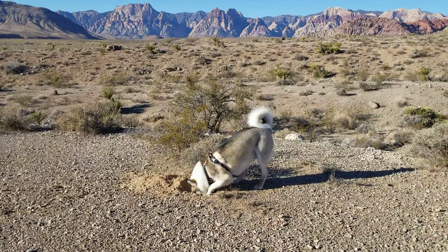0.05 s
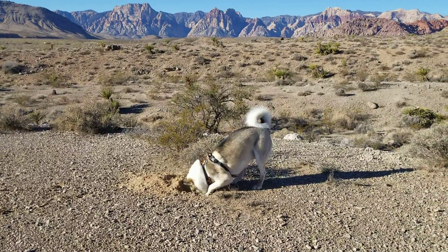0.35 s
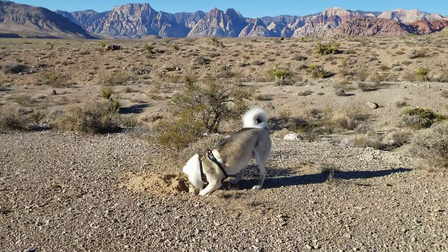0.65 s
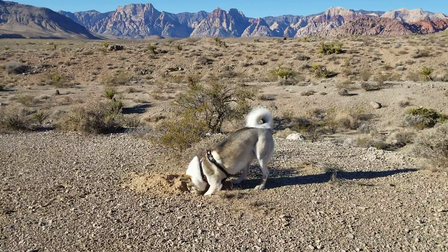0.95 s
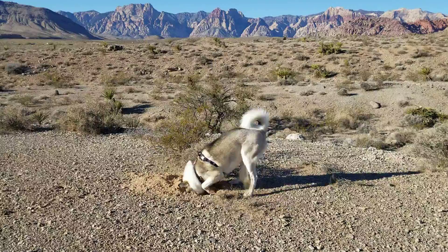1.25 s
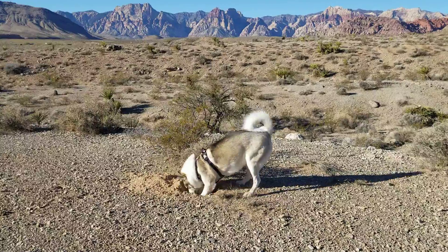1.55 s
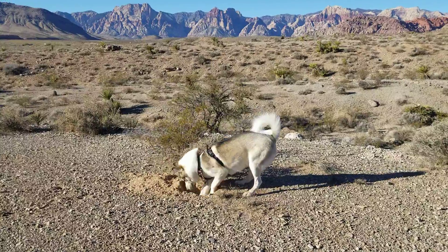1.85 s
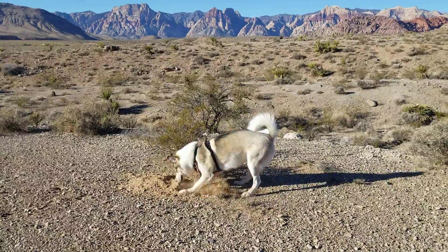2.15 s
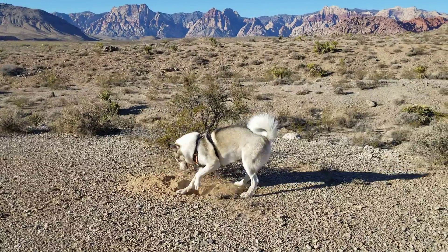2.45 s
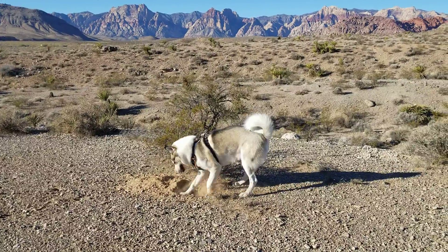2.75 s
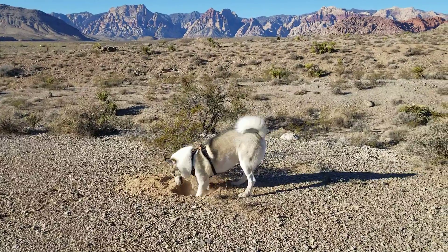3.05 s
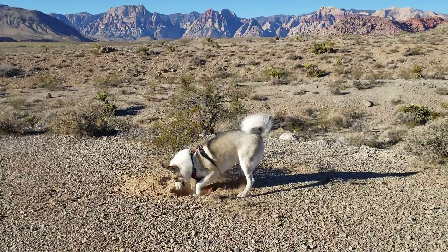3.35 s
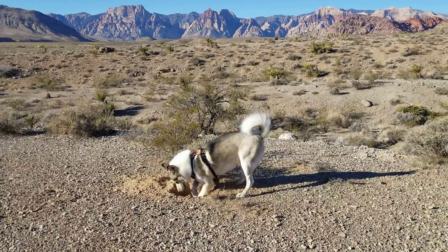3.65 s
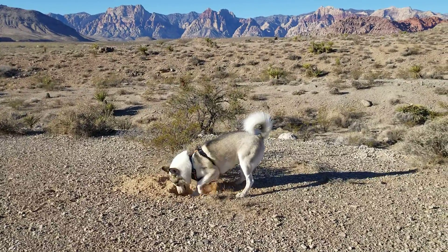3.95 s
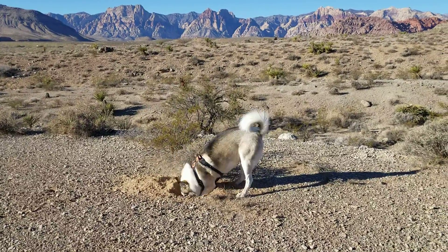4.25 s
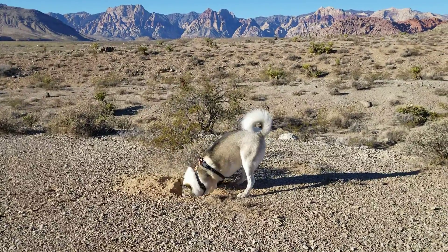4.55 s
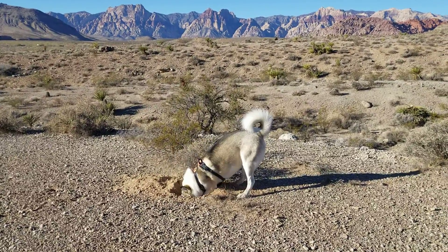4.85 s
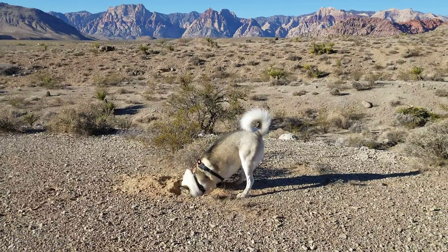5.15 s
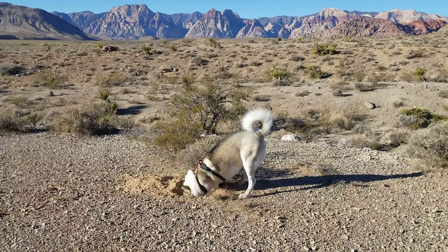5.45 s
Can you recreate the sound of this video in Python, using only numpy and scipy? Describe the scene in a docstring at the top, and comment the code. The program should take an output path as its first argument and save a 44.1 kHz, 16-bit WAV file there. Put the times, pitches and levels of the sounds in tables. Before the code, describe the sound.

Light wind rumbles outdoors as a dog's paws scrape and thud in gritty dirt and its metal tags clink.

```python
"""Open desert, no walls: light wind rumbles on the microphone over a faint far drone and steady hiss.
After a soft swish, a dog a few metres away starts digging at 0.5 s: claws rake dry, gravelly soil,
paws thud on it, thrown grit scatters. From 1.1 s the metal tags on its harness knock, tick and ring.
The digging peaks near 2.6 s and stops by 4.3 s; wind, drone and hiss remain."""
import sys
import numpy as np
from scipy import signal
from scipy.fft import rfft, irfft
from scipy.io import wavfile
from scipy.ndimage import uniform_filter1d

SR = 44100
rng = np.random.default_rng(int(sys.argv[2]) if len(sys.argv) > 2 else 0)


def wav_out(sig):
    """Save sig, one row per channel (or a flat mono array), as 16-bit PCM at SR to the path in sys.argv[1]."""
    wavfile.write(sys.argv[1], SR, np.round(np.clip(np.atleast_2d(sig).T, -1, 1) * 32767).astype(np.int16))


N = 242991
TIME_S = np.arange(N) / SR
FREQ_HZ = np.maximum(np.arange(N // 2 + 1) * SR / N, 1)

# wind strength: t/s, level/dB
WIND_LEVEL = [(0, -43.5), (.6, -46), (1.8, -43), (2.15, -47), (3.05, -44.5), (3.5, -48.5), (5.5, -48.5)]
# microphone hiss: f/Hz, left density/dB, right density/dB
HISS_SPECTRA = [(600, -110, -112), (1320, -109, -113), (1686, -88.5, -114), (2397, -113, -116),
                (3010, -107, -118), (3517, -96, -120), (4720, -93, -121), (5560, -107, -120),
                (6400, -105, -119), (7020, -127, -128), (9200, -127, -130), (10200, -112, -118),
                (14470, -110, -110)]
# soft swishes: t/s, half-width/s, level/dB
SWISHES = [(0.109, 0.07, -49.5), (.3, 0.11, -58), (.82, 0.2, -60.5)]
# stereo image of the digging spot: f/Hz, left re right/dB, coherence
DIG_STEREO = [(300, 1.5, 1), (702, -0.5, 0.59), (1400, 3, 0.35), (2392, -0.5, .45), (4050, 4.5, 0.12),
              (8000, -27, .3), (15180, -10.5, .05)]
# claw strokes: t/s, length/s, level/dB, rasp centre f/Hz (lower when deeper)
STROKES = [(0.484, 0.18, -58, 1140), (0.929, 0.18, -68.5, 520), (1.645, 0.14, -56, 704),
           (1.771, 0.13, -65.5, 550), (1.856, 0.28, -63.5, 710), (2.044, 0.19, -57.5, 958),
           (2.25, 0.058, -47, 1400), (2.29, 0.13, -47.5, 1210), (2.515, 0.076, -45, 1170),
           (2.6, 0.14, -59.5, 1243), (2.71, .12, -49, 1024), (2.876, 0.099, -49.5, 1050),
           (2.958, .19, -58.5, 910), (3.199, 0.19, -62, 840), (3.287, 0.22, -58.5, 1060),
           (3.435, 0.21, -59, 865), (3.615, 0.13, -57.5, 1010), (3.715, 0.21, -63, 810),
           (3.935, 0.25, -61, 800)]
# rasp of one stroke: f/centre, level/dB
RASP_SHAPE = [(.4, -6.5), (.7, 4.5), (1.25, 4.5), (1.8, -0.5), (3.0, -3.5)]
# paw strikes: t/s, level/dB, f/Hz, relative crunch/dB
PAW_STRIKES = [(0.529, -42.5, 270, -22), (1.029, -49, 282, -29), (1.662, -42.5, 297, -13.5),
               (1.696, -45, 610, -5), (1.709, -41, 607, -11), (1.732, -36, 244, -19),
               (2.336, -35.5, 252, -13), (2.552, -34, 254, -11), (2.582, -18.5, 233, -15),
               (2.758, -33.5, 304, -17), (2.892, -48, 433, -5), (2.926, -32.5, 272, -10),
               (3.053, -39.5, 298, -23), (3.343, -40.5, 264, -7), (3.375, -48, 399, 4.5),
               (3.592, -40.5, 273, -15.5), (3.658, -43, 256, -5.5), (4.025, -42.5, 207, -27),
               (4.103, -45, 236, -25)]
# packed-soil modes: f/strike pitch, level/dB, t60/s
SOIL_MODES = [(.65, -10.5, 0.033), (1.04, 7, 0.034), (1.9, -7.5, 0.0092)]
# digging effort, keeps loose grit running: t/s, level/dB
EFFORT = [(0, -11), (1.3, -5), (1.55, -11), (1.9, -1.5), (2.7, 6.5), (3.1, -4), (3.35, -0.5), (4.15, -7.5),
          (4.55, -23)]
# tag knocks: t/s, level/dB, base t60/s, strike point (0 rim, 1 centre)
KNOCKS = [(1.165, -40, 0.036, 0.33), (1.178, -30.5, 0.033, 0.2), (1.318, -38.5, 0.055, .2),
          (1.363, -28, 0.054, 0.58), (1.495, -40, 0.065, 0.53), (1.556, -33.5, 0.022, 0.45),
          (1.701, -36, 0.072, .7), (1.756, -31, 0.056, 0.053), (1.871, -34, 0.054, .75),
          (1.887, -37, 0.088, 0.72), (1.913, -36, 0.03, 0.72), (1.948, -34.5, 0.052, 0.51),
          (1.9953, -24, 0.01, 0.84), (2.0045, -40, 0.03, .74), (2.17, -37, 0.026, 0.75),
          (2.2344, -43, 0.037, .2), (2.381, -21, 0.019, 0.35), (2.424, -19, .035, 0.065),
          (2.494, -22, 0.036, 0.99), (2.5346, -31.5, 0.037, 0.52), (2.5832, -9.5, 0.039, 0.47),
          (2.621, -21, 0.085, 0.42), (2.721, -11.5, 0.032, 0.28), (2.744, -31, 0.064, 0.49),
          (2.8237, -32.5, 0.11, 0.39), (2.9418, -36.5, 0.071, 0.33), (2.979, -41.5, 0.13, .85),
          (3.061, -31.5, 0.076, 0.47), (3.1674, -28.5, 0.11, 0.37), (3.2259, -23, 0.034, .45),
          (3.2405, -22, 0.12, 0.89), (3.2484, -16.5, 0.079, 0.46), (3.3288, -24.5, 0.046, 0.53),
          (3.374, -20, 0.011, .22), (3.388, -28, 0.095, 0.45), (3.4475, -31.5, 0.11, 0.57),
          (3.4972, -35.5, 0.074, 0.52), (3.5537, -34.5, 0.085, 0.47), (3.588, -41.5, 0.043, 0.67),
          (3.6315, -26.5, 0.058, 0.33), (3.6775, -26.5, .014, 0.35), (3.7458, -9, 0.012, 0),
          (3.757, -30, 0.054, .45), (3.789, -39.5, 0.057, .72), (3.88, -36, 0.035, 0.43),
          (3.9157, -33, 0.015, 0.35), (4.0089, -30.5, .05, .75), (4.029, -30, 0.064, .7),
          (4.079, -28, 0.0088, 0.37), (4.136, -28.5, 0.042, 0.42), (4.146, -27, 0.058, 0.61),
          (4.2374, -31, 0.064, 0.47)]
# tag modes: f/Hz
TAG_HZ = [3822, 5397, 5407, 5802, 9060, 12130, 12375, 12460, 12760, 13136, 13571, 15588]
# per tag mode: level in group/dB, t60/base t60, extra t60/s, left re right/dB
TAG_MODES = [(-28.5, 1.5, 0.034, -7.5), (-6.5, 1.5, 0.044, -10), (-2.5, 2.0, 0.082, -10),
             (-19, 1.0, 0, -13), (-3, 1.0, 0.017, -15), (-17, .6, 0.02, -22.5), (-7.5, 1.2, 0.00016, -31),
             (-6.5, 1.0, 0, -11.5), (-1, 1.05, 0.0089, -32.5), (-20.5, 1.2, 0.06, -16.5),
             (-27, 1.0, 0.02, -26), (-3.5, 1.0, 0.032, -5.5)]
# per tag mode: group (0 low, 1 middle, 2 main, 3 top)
TAG_GROUP = [0, 0, 0, 0, 1, 2, 2, 2, 2, 2, 2, 3]
# tag excitation re main modes: strike point, low/dB, middle/dB, top/dB, tick/dB
STRIKE_RESPONSE = [(0, -59, -45.5, -25, -39), (.25, -28.5, -26.5, -13.5, -19.5), (.5, -11, -21, -21, -18.5),
                   (.75, 0.5, -11, -8.5, -5.5), (1, -22, 4.5, -18, -19)]
# source spectra: f/Hz, relative density/dB
WIND_SPECTRUM = [(20, -18), (35, -13), (55, 2), (90, 0.5), (130, -7.5), (200, -15), (300, -18),
                 (450, -29.5), (650, -36.5), (1000, -55), (2000, -83.5)]
SWISH_SPECTRUM = [(1300, -8), (2000, 5), (2600, 1.5), (3300, -9), (4600, 0.5), (6000, 4), (8300, -13),
                  (10500, -7.5), (13500, 1.5), (15800, -7)]
CLOD_SPECTRUM = [(110, -13.5), (200, 0), (330, -3.5), (450, -9.5), (700, -10.5), (1100, -62)]
CRUNCH_SPECTRUM = [(400, -6.5), (700, -4), (1300, 6), (1800, -1), (2600, -18.5), (4000, -9)]
GRIT_SPECTRUM = [(1100, -3), (2200, -0.5), (3200, -2.5), (4400, 2), (5800, 10.5), (7200, -1.5), (8400, -8),
                 (10500, 0.5), (13500, 12.5), (16000, -15)]
TICK_SPECTRUM = [(2500, -15), (4000, -9), (5500, 22.5), (7000, 4.5), (8300, 2.5), (10500, 10.5),
                 (12500, 18), (16000, -20.5)]

TYPICAL_RASP_HZ = 1006


def from_db(db):
    return 10 ** (np.asarray(db) / 20)


def unit_rms(x):
    return x / np.sqrt(np.mean(x ** 2) + 1e-20)


def over_time(rows):
    return np.interp(TIME_S, *np.transpose(rows))


def over_freq(rows):
    hz, *columns = np.transpose(rows)
    return [np.interp(np.log(FREQ_HZ), np.log(hz), column) for column in columns]


def band_gains(spectrum):
    """Unit-power filter, steep beyond the table's ends."""
    octaves_below = np.maximum(np.log2(spectrum[0][0] / FREQ_HZ), 0)
    octaves_above = np.maximum(np.log2(FREQ_HZ / spectrum[-1][0]), 0)
    return unit_rms(from_db(over_freq(spectrum)[0] - 31.6 * (octaves_below + octaves_above)))


def drift(rate_hz):
    """Smooth random curve, rms 1."""
    knots = signal.resample_poly(rng.standard_normal(int(N / SR * rate_hz) + 4), 4, 1)
    return unit_rms(np.interp(TIME_S * rate_hz * 4, np.arange(len(knots)), knots))


def grains(per_s, spread_db):
    """Two independent trains of tiny collisions, mostly weak; rms 1."""
    trains = np.zeros(2 * N)
    place, size, sign = rng.random((int(2 * per_s * N / SR), 3)).T
    size_db = spread_db * np.minimum(-np.log(1 - size), 4)
    trains[(place * 2 * N).astype(int)] = from_db(size_db) * np.sign(sign - .5)
    return unit_rms(trains.reshape(2, N))


def bursts(times_s, levels_db, t60_s, weights=1):
    """Envelope that jumps at each time, then decays."""
    kicks = np.zeros(N)
    kicks[(times_s * SR).astype(int)] = from_db(levels_db) * weights
    return signal.lfilter([1], [1, -from_db(-60 / (t60_s * SR))], kicks + 1e-18)


def at_dig(pair, spectrum=None):
    """Two independent signals to stereo, optionally filtered: bass centred, treble right."""
    spectra = rfft(pair) * (1 if spectrum is None else band_gains(spectrum))
    left_db, coherence = over_freq(DIG_STEREO)
    mid, side = spectra * np.sqrt([(1 + coherence) / 2, (1 - coherence) / 2])
    return irfft(np.array([(mid + side) * from_db(left_db), mid - side]), N)


def wind(gain_db, lumps_db, side_db, eddy_hz):
    """Lumpy rumble on the microphone; only the slowest eddies differ much between sides."""
    width = from_db(side_db) + (eddy_hz / (FREQ_HZ + eddy_hz)) ** 2
    spectra = rfft(rng.standard_normal((2, N))) * band_gains(WIND_SPECTRUM)
    mid, side = irfft(spectra * [np.ones_like(width), width], N)
    level_db = over_time(WIND_LEVEL) + gain_db + lumps_db * drift(14)
    return np.array([mid + side, mid - side]) * from_db(level_db)


def drone(hz, level_db, waver_hz, waver_db, octave_db):
    """Far wavering hum, like an engine heard through moving air."""
    phase = 2 * np.pi * np.cumsum(hz + waver_hz * drift(9)) / SR
    tone = np.sin(phase) + from_db(octave_db) * np.sin(2 * phase)
    return from_db(level_db + waver_db * drift(6)) * tone


def hiss(gain_db):
    """Each microphone's own noise, stronger on the left."""
    density = from_db(np.array(over_freq(HISS_SPECTRA)) + gain_db)
    return irfft(rfft(rng.standard_normal((2, N))) * density, N) * np.sqrt(SR / 2)


def swishes(left_db):
    """Short airy swells, off to the right."""
    swell = sum(from_db(db) * np.exp(-((TIME_S - at_s) / half_s) ** 2) for at_s, half_s, db in SWISHES)
    return at_dig(rng.standard_normal((2, N)) * swell, SWISH_SPECTRUM) * from_db([[left_db], [0]])


def strokes():
    """Per claw stroke: sample span, half-sine swell, rasp centre."""
    for start_s, length_s, db, hz in STROKES:
        first, size = int(start_s * SR), int(length_s * SR)
        yield slice(first, first + size), from_db(db) * np.sin(np.pi * np.arange(size) / size), hz


def raking(rasp_db, catch_db, clod_db_per_octave):
    """Claws catch and slip: dry rasp over dull clods; deeper strokes break more clods."""
    catch = from_db(catch_db * drift(80))
    crumbs = grains(per_s=2400, spread_db=3.6) * catch
    clod_level, rasp = np.zeros(N), np.zeros((2, N))
    ratios, shape_db = np.transpose(RASP_SHAPE)
    for span, swell, hz in strokes():
        clod_level[span] += from_db(-clod_db_per_octave * np.log2(hz / TYPICAL_RASP_HZ)) * swell
        bins_hz = np.maximum(np.fft.rfftfreq(len(swell), 1 / SR), 1)
        band_db = np.interp(np.log(bins_hz / hz), np.log(ratios), shape_db, left=-30, right=-60)
        scrape = irfft(rfft(crumbs[:, span]) * unit_rms(from_db(band_db)), len(swell))
        rasp[:, span] += from_db(rasp_db) * swell * scrape
    clods = grains(per_s=1500, spread_db=3.1) * clod_level * catch
    return at_dig(clods, CLOD_SPECTRUM) + at_dig(rasp)


def paws(thud_db, crunch_db, crunch_t60_s):
    """Paws thump packed soil and crush its crust."""
    times_s, levels_db, pitches_hz, crust_db = np.transpose(PAW_STRIKES)
    thuds, t = np.zeros(N), TIME_S[:SR // 8]
    attack = 1 - np.exp(-t / 0.0015)
    for at_s, db, hz in zip(times_s, levels_db, pitches_hz):
        thud = sum(from_db(mode_db - 60 * t / t60_s) * np.sin(2 * np.pi * hz * ratio * t)
                   for ratio, mode_db, t60_s in SOIL_MODES)
        first = int(at_s * SR)
        thuds[first:first + len(t)] += from_db(db + thud_db) * thud * attack
    crush = bursts(times_s, levels_db + crust_db + crunch_db, crunch_t60_s)
    return thuds + at_dig(grains(per_s=3294, spread_db=2.9) * crush, CRUNCH_SPECTRUM)


def grit(throw_db, throw_db_per_octave, settle_t60_s, trickle_db, clump_db):
    """Sand and small stones fall in clumps over a trickle; deeper strokes throw less."""
    thrown = np.zeros(N)
    for span, swell, hz in strokes():
        thrown[span] += from_db(throw_db + throw_db_per_octave * np.log2(hz / TYPICAL_RASP_HZ)) * swell
    pole = from_db(-60 / (settle_t60_s * SR))
    falling = signal.lfilter([1 - pole], [1, -pole], thrown + 1e-18)
    flow = np.hypot(falling, from_db(trickle_db + over_time(EFFORT)))
    stones = grains(per_s=150, spread_db=3.6)
    sand = grains(per_s=12000, spread_db=1.7)
    return at_dig((sand + stones) * flow * from_db(clump_db * drift(40)), GRIT_SPECTRUM)


def strike_db(point):
    """Low, middle, main, top and tick levels for a strike point on a tag."""
    points, *columns = np.transpose(STRIKE_RESPONSE)
    low, middle, top, tick = (np.interp(point, points, column) for column in columns)
    return np.array([low, middle, np.zeros_like(low), top, tick])


def tag_ring(t60_s, group_db, free_s, vary_db=4, bend_cycles=1.5, buzz_cycles=0.68):
    """One ring: holds, sinks faster as the tags settle together, is choked after free_s."""
    mode_db, t60_ratio, extra_s, left_db = np.transpose(TAG_MODES)
    t = TIME_S[:int(min(free_s + .012, .3) * SR)]
    emphasis, bend = rng.standard_normal((2, len(TAG_HZ), 1))
    upper = (np.array(TAG_GROUP) >= 2)[:, None]   # main and top modes vary per knock
    start_db = (group_db[TAG_GROUP] + mode_db)[:, None] + vary_db * emphasis * upper
    life_s = (t60_s * t60_ratio + extra_s)[:, None]
    fade = from_db(start_db - 60 * (t / life_s) ** 1.4)
    # tags pressed harder ring shorter, bend and buzz more
    walks = np.cumsum(rng.standard_normal((len(TAG_HZ), 320)), axis=1)   # 1 ms steps
    wander = np.array([np.interp(t, np.arange(320) / 1000, walk) for walk in walks])
    offset_cycles = bend_cycles * bend * t / life_s + buzz_cycles * wander / np.sqrt(1000 * life_s)
    cycles = np.array(TAG_HZ)[:, None] * (t + rng.uniform(0, 0.0088)) + upper * offset_cycles
    modes = fade * np.sin(2 * np.pi * cycles)
    attack = 1 - np.exp(-t / 0.00042)
    choke = np.exp(-np.maximum(t - free_s, 0) / 0.0026)
    return np.array([from_db(left_db) @ modes, modes.sum(axis=0)]) * attack * choke


def tag_jingle(gain_db, faint_db, faint_t60_s, faint_count, faint_span_s):
    """Tags knock together, each knock choking the last; faint random touches fall between."""
    gaps_s = np.diff([row[0] for row in KNOCKS] + [N / SR])
    touches = [(*row, gap_s) for row, gap_s in zip(KNOCKS, gaps_s)]
    start_s, end_s = faint_span_s
    slot_s = (end_s - start_s) / faint_count
    for slot, (jitter, point) in enumerate(rng.random((faint_count, 2))):
        touches.append((start_s + (slot + jitter) * slot_s, faint_db, faint_t60_s, point / 2, .04))
    jingle = np.zeros((2, N))
    for at_s, db, t60_s, point, free_s in touches:
        ring = tag_ring(t60_s, db + strike_db(point)[:-1], free_s)
        first = int(at_s * SR)
        jingle[:, first:first + ring.shape[1]] += ring
    return from_db(gain_db) * jingle


def tag_ticks(graze_db, graze_lead_s, edge_db, rattle_db):
    """Tags graze, meet with a hard edge, then rattle in small rebounds."""
    times_s, db, ring_s, point = np.transpose(KNOCKS)
    clack_db = -1.5 * np.log2(ring_s / 0.0488)   # pressed tags ring less, clack more
    tick_db = db + strike_db(point)[-1] + clack_db
    lead_s = graze_lead_s * rng.uniform(0.404, 1, len(times_s))
    graze = bursts(times_s - lead_s, db + graze_db, t60_s=0.06)
    edge = bursts(times_s, tick_db + edge_db, t60_s=0.016)
    contact = grains(per_s=12000, spread_db=2.2) * uniform_filter1d(graze + edge, size=24)
    rattle = grains(per_s=460, spread_db=2.81) * bursts(times_s, tick_db + rattle_db, t60_s=0.1)
    return at_dig(contact + rattle, TICK_SPECTRUM)


def tag_afterring(gain_db, t60_s, swell_s, waver_hz, flutter_db, left_db):
    """A free-swinging tag picks up each knock and sings on in its lowest strong mode."""
    times_s, db, ring_s, point = np.transpose(KNOCKS)
    drive = bursts(times_s, db + strike_db(point)[0] + gain_db, t60_s, ring_s / ring_s.mean())
    pole = np.exp(-1 / (swell_s * SR))
    swell = signal.lfilter([1 - pole], [1, -pole], drive)
    phase = 2 * np.pi * np.cumsum(np.mean(TAG_HZ[1:3]) + waver_hz * drift(20)) / SR
    return swell * np.sin(phase) * from_db(flutter_db * drift(14) + [[left_db], [0]])


def delay_right(pair, lag_s):
    """Travel time between the microphones."""
    return np.array([pair[0], np.interp(TIME_S - lag_s, TIME_S, pair[1])])


def scene():
    """Harness and dirt over the open-air background."""
    tags = tag_jingle(gain_db=0.5, faint_db=-41.5, faint_t60_s=0.041, faint_count=26,
                      faint_span_s=(1.1, 4.25))
    tags += tag_ticks(graze_db=-29.5, graze_lead_s=0.017, edge_db=8, rattle_db=-5)
    tags += tag_afterring(gain_db=-11.5, t60_s=0.22, swell_s=.025, waver_hz=7.3, flutter_db=4,
                          left_db=-8.5)
    dirt = paws(thud_db=-0.5, crunch_db=1, crunch_t60_s=0.033)
    dirt += raking(rasp_db=-5.5, catch_db=2.5, clod_db_per_octave=11.5)
    dirt += grit(throw_db=-10, throw_db_per_octave=18.5, settle_t60_s=.08, trickle_db=-58.5,
                 clump_db=3.5)
    air = wind(gain_db=-1.5, lumps_db=1.18, side_db=-20, eddy_hz=55.4)
    air += drone(hz=76.5, level_db=-51.5, waver_hz=0.785, waver_db=2.2, octave_db=-9.5)
    return tags + delay_right(dirt + air, lag_s=0.00017) + hiss(gain_db=-1) + swishes(left_db=-10)


def record(dry):
    """Steep low-pass at 16.2 kHz."""
    return signal.sosfilt(signal.ellip(10, .1, 80, 16200, fs=SR, output="sos"), dry)


dry = scene()
out = record(dry)
wav_out(out)
```